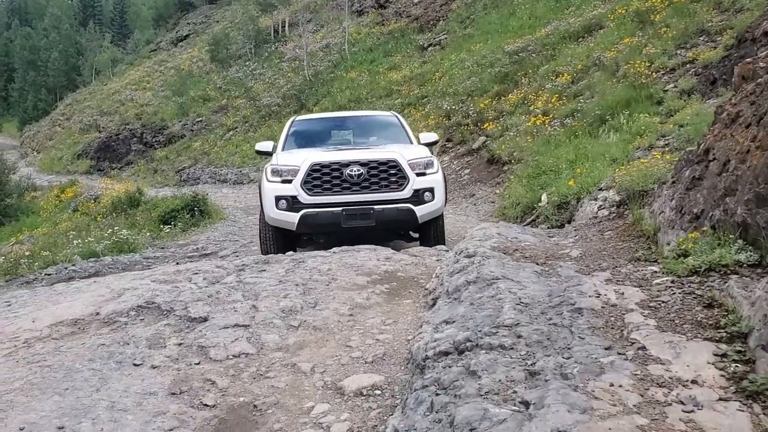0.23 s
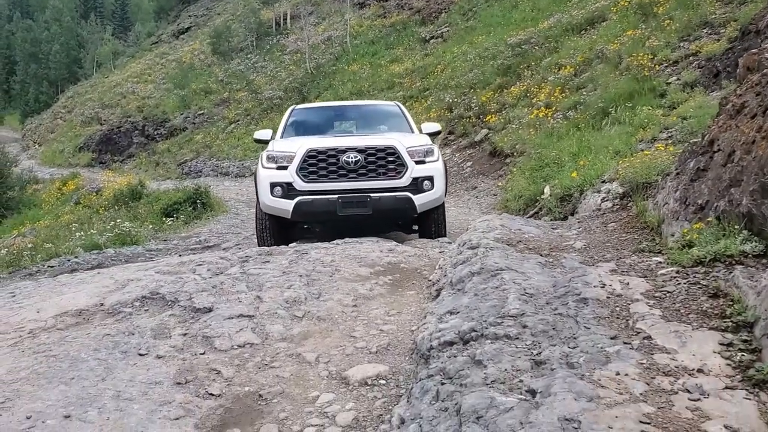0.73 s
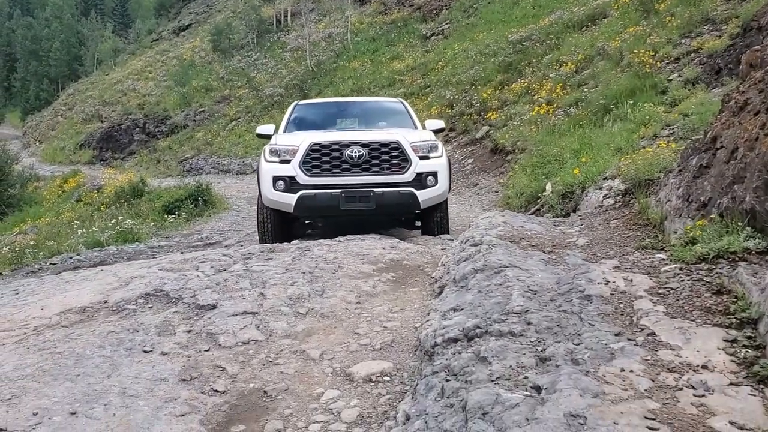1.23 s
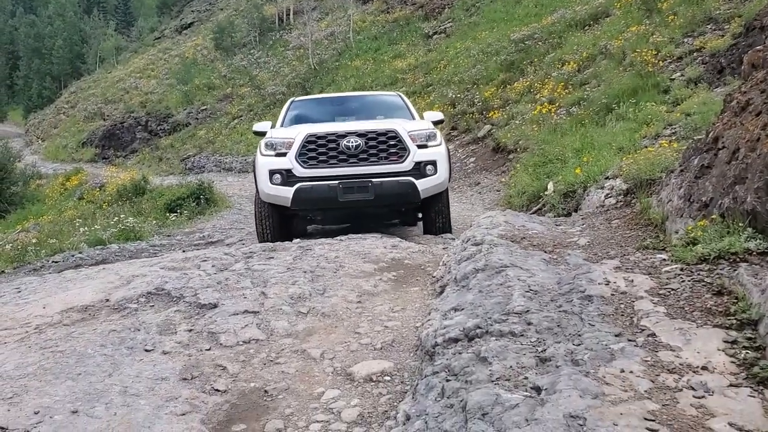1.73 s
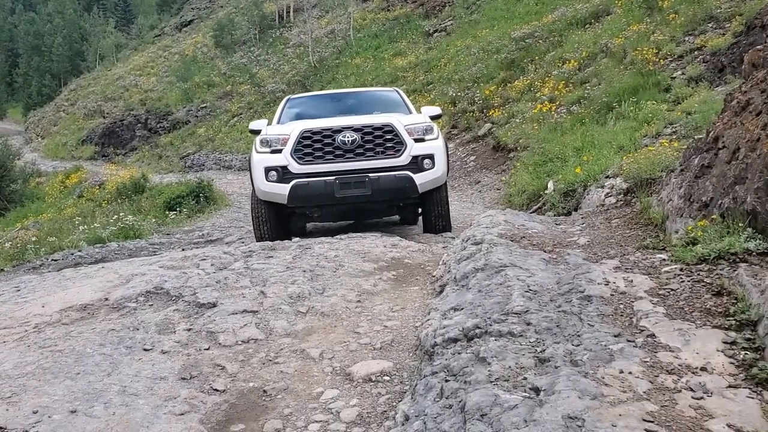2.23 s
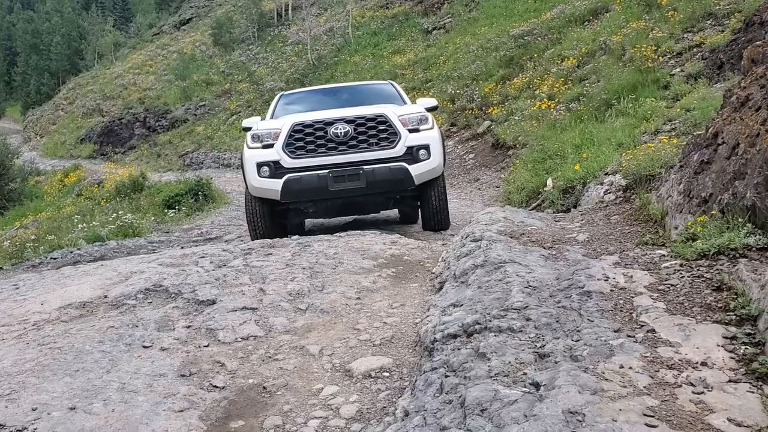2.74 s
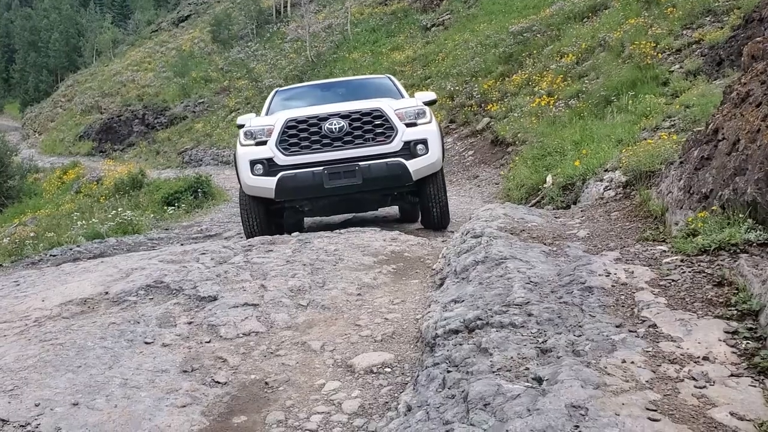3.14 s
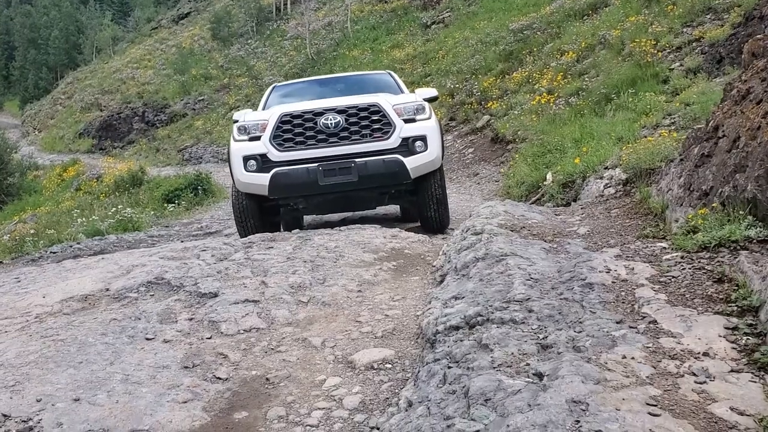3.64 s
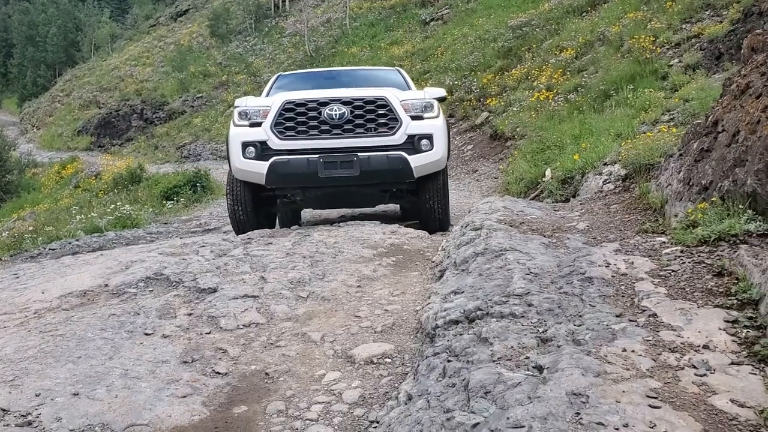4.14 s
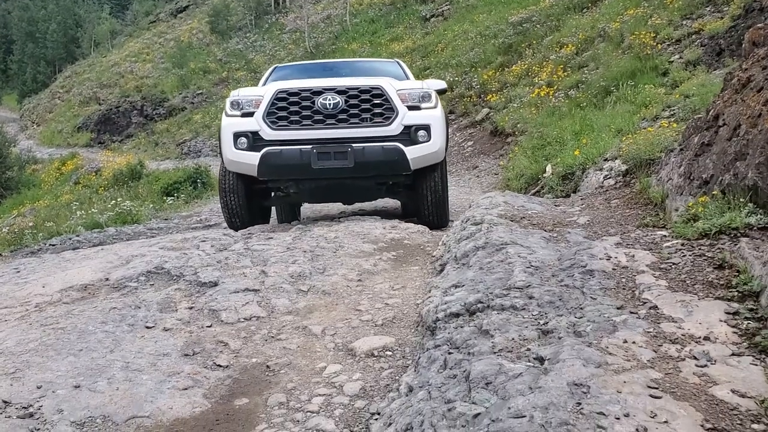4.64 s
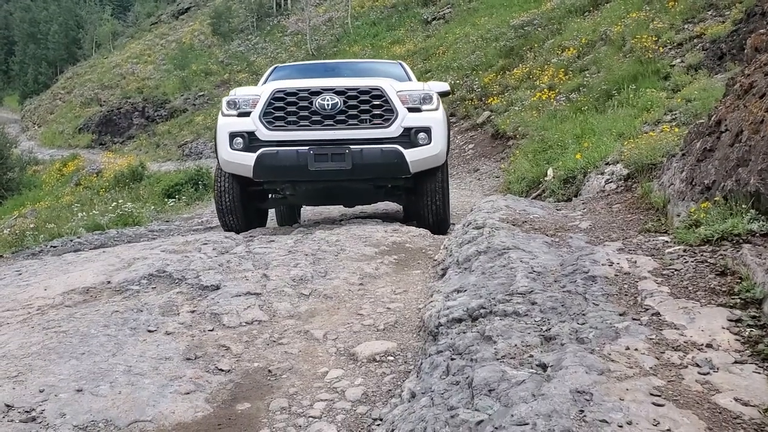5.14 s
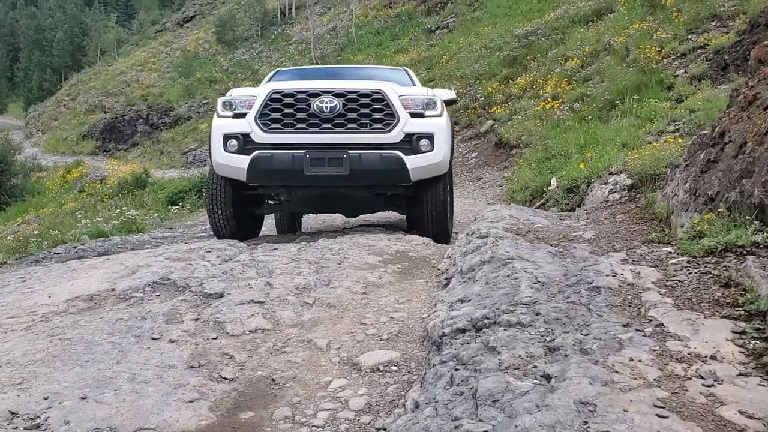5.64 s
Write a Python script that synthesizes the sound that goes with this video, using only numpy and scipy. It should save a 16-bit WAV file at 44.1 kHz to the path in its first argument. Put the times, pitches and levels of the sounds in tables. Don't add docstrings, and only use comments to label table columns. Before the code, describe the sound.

Close, dry outdoor stereo: a low, throbbing petrol engine labours with irregular hard firings and brief dips, while broad airy fan noise swells and eases. Early rubber chirps and grit ticks give way to short scuffs, a sharp stone crack just before three seconds with wind thumps, then a quieter spell and heavier surges near the end.

```python
import sys
import numpy as np
from scipy import signal
from scipy.fft import rfft, irfft, next_fast_len
from scipy.io import wavfile
from scipy.ndimage import uniform_filter1d, map_coordinates

SR = 44100
rng = np.random.default_rng(int(sys.argv[2]) if len(sys.argv) > 2 else 0)


def amplitude_ratio(level_db):
    exponent = np.asarray(level_db, float) / 20
    return 10 ** exponent


def transcribe(u):
    v = np.clip(np.atleast_2d(u).T, -1, 1)
    q = np.round(v * 32767).astype(np.int16)
    wavfile.write(sys.argv[1], SR, q)


N = 259749

# (time [s], boom order [Hz], exhaust boom level [dB])
CRANK = [(0, 107, -39), (.33, 101, -42.5), (.7, 73, -47), (.87, 84, -43), (1.02, 103, -43), (1.3, 130, -37),
         (1.5, 136, -36), (2.1, 115, -39.5), (2.45, 131, -34.5), (2.8, 134, -35.5), (3.05, 117, -42),
         (3.3, 114, -53), (3.45, 118, -41.5), (3.75, 122, -40.5), (4.25, 135, -40.5), (4.75, 100, -42),
         (5.32, 118, -35.5), (5.5, 121, -38), (5.89, 122, -38)]
# (time [s], flow level [dB])
AIR_FLOW = [(0, -49), (.39, -47), (.55, -50), (.8, -50), (1.08, -46.5), (1.44, -44), (1.84, -46.5),
            (2.15, -46.5), (2.46, -43), (2.6, -43), (2.92, -46), (3.5, -48), (4.28, -47.5), (4.69, -47),
            (5.12, -45.5), (5.89, -43.5)]
USUAL_LOAD_DB, USUAL_FLOW_DB = -39, -47

# (frequency [Hz], level per Hz [dB])
PIPE = [(35, -40), (55, -17.5), (78, 0.5), (105, 1.5), (130, -5), (150, -3), (178, -7), (205, -17.5),
        (260, -24.5), (420, -65)]
# (frequency [Hz], width [Hz], level [dB])
UNDERBODY = [(257.7, 91, 6), (325, 160, -17)]
GROWL_DB, GROWL_PER_LOAD, GROWL_PER_FLOW = -47, 0.46, 0.55
# (middle time [s], peak level [dB], length [s])
PULLS = [(.1, -34, 0.053), (.82, -39.5, 0.11), (1.03, -35, 0.17), (1.2, -31, 0.18), (1.5, -41.5, 0.13),
         (2.05, -37.5, 0.15), (2.28, -32.5, 0.17), (2.8, -43, 0.18), (3.1, -36.5, 0.23), (3.33, -47, 0.16),
         (3.5, -48, 0.11), (3.66, -49, 0.067), (4.3, -47, 0.16), (4.9, -40, 0.24), (5.2, -34.5, 0.3),
         (5.6, -32, 0.13), (5.89, -38, 0.25)]
HUM_DB = -49.5
# (middle time [s], peak level [dB], length [s], frequency [Hz])
LUGS = [
    (0.046, -35.5, 0.11, 79.8),
    (1.285, -32, 0.074, 87.2),
    (1.497, -32.5, 0.12, 91.4),
    (2.353, -28, 0.06, 88.32),
    (2.485, -34, 0.12, 92.1),
    (2.653, -18.5, 0.031, 97.5),
    (4.203, -37.5, 0.16, 103.9),
    (4.422, -40, 0.12, 94.9),
    (5.51, -34, 0.081, 94.8),
    (5.89, -29, 0.062, 100.1),
]
# (middle time [s], peak level [dB], length [s])
WHINE = [
    (2.42, -46, 0.061),
    (2.65, -45, 0.19),
]
# (time [s], peak level [dB], ring [Hz], depth of the gap before [dB])
SURGES = [(0.42, -26, 78.1, 3), (0.504, -24, 129, 1), (0.644, -21, 78.1, 10), (0.747, -22, 75.4, 3),
          (1.009, -22, 94.2, 6), (1.276, -17, 102, 3.5), (1.573, -25, 113, 1.5), (1.744, -22, 90, 2),
          (1.923, -17, 107, 1), (2.032, -20, 79, 6.5), (2.334, -20, 91.5, 4), (2.759, -23, 88.8, 2),
          (3.007, -23, 83.4, 4), (3.345, -25, 67.3, 6), (3.556, -27, 80.7, 4), (3.653, -20, 72.7, 6),
          (3.803, -23, 94.2, 5), (4.011, -25, 83.4, 3), (4.103, -29, 91.5, 4), (4.182, -18, 99.6, 5),
          (4.584, -34, 75.4, 1), (4.645, -23, 93, 4), (4.731, -28, 102, 0), (4.829, -16, 72.7, -2),
          (5.076, -29, 103, 3), (5.171, -11.5, 111, 2), (5.28, -14.5, 109, 7.5), (5.431, -31, 102, 2),
          (5.519, -27, 88.8, 2), (5.673, -19, 110, 2)]
SURGE_DB, SURGE_T60_S, GAP_S = -5, 0.086, 0.015
CHUG = .35

# (frequency [Hz], width [Hz], level [dB])
INTAKE = [(572, 180, 0), (760, 600, -3.5), (421, 190, 2)]
# (frequency [Hz], width [Hz], level [dB])
AIRBOX = [(536, 85, -0.5), (600, 80, -1), (720, 110, -10)]
# (middle time [s], change of level [dB], length [s])
TRACT = [
    (0.856, -9, 0.06),
    (1.67, 2, 0.4),
    (2.547, 1.5, 0.12),
    (2.76, 1.5, 0.14),
    (3.5, -2, 0.24),
    (5.502, 0, 0.37),
]
ROAR_DB, ROAR_PER_LOAD, ROAR_PER_FLOW = -48, 0.14, 0.27
# (frequency [Hz], level per Hz [dB])
FAN = [(410, -5.5), (700, 0.5), (825, -4.5), (983, -4.5), (1270, -2), (1380, -3), (1660, -3.5),
       (2330, -5.5), (2540, -5.5), (2930, -9.5), (4610, -18.5), (6540, -23), (8200, -36.5), (10700, -49),
       (18000, -120)]
# (frequency [Hz], width [Hz], level [dB])
SHROUD = [(1020, 370, 3), (1635, 470, 3), (2485, 220, 5)]
# (frequency [Hz], level per Hz [dB])
FIZZ = [(4120, -43), (7000, -4.5), (8040, -14), (9060, -5.5), (10100, -10), (11200, -9.5), (12100, -13),
        (12700, -15), (13300, -11), (14000, -9.5), (15700, -12)]
FIZZ_DB, FIZZ_PER_FLOW = -68.5, 1.46
FIZZ_PER_REV, FIZZ_LAG_S = 0.04, 0.1

# (frequency [Hz], level per Hz [dB])
BUFFET = [(12, -48), (20, -13), (52, 4), (75, 4), (97, -0.5), (163, -15.5), (189, -15.5), (300, -33.5),
          (390, -53), (660, -120)]
# (middle time [s], peak level [dB], length [s], left minus right [dB])
GUSTS = [(0.013, -42.5, 0.06, -21), (0.284, -39.5, 0.11, -8), (0.437, -37, 0.034, -14),
         (0.71, -36, 0.18, -2), (0.604, -51, 0.092, -5), (0.847, -39.5, 0.11, -12),
         (1.04, -37.5, 0.042, -25), (1.166, -40.5, 0.07, -22), (1.592, -41, 0.029, -17),
         (1.663, -28.5, 0.027, -2.5), (2.035, -38.5, 0.072, -16.5), (2.504, -42, 0.04, -13),
         (2.55, -41, 0.014, 20), (2.678, -34.5, 0.055, -15.5), (2.809, -34.5, 0.027, -22),
         (2.962, -28, 0.078, -6.5), (3.04, -34, 0.035, -9), (3.105, -33, 0.054, -14),
         (3.262, -34, 0.044, 8), (3.375, -32.5, 0.049, 12.5), (3.704, -44.5, 0.17, 11),
         (3.82, -36.5, 0.11, -10), (4.026, -38, 0.048, -5), (4.449, -38, 0.024, -23),
         (4.584, -39.5, 0.11, 13), (4.833, -36.5, 0.068, -11), (5.023, -41, 0.019, -24),
         (5.298, -43, 0.091, -12), (5.541, -38.5, 0.03, -19), (5.596, -46, .025, 8.5)]
BREEZE_DB, BREEZE_PAN_DB = -47, -10.5
# (time [s], left size [full scale], right size [full scale], width [s])
THUMPS = [
    (1.749, 0, -.09, .0018),
    (1.762, -.06, -.07, .0018),
    (2.7695, 0, -.13, .002),
    (2.775, 0, .2, .0016),
    (2.805, .04, .17, .003),
    (3.343, -.1, 0, .002),
    (3.384, .16, 0, .0012),
    (3.389, -.08, 0, .002),
]

# (middle time [s], peak level [dB], frequency [Hz], length [s])
THUDS = [(1.55, -41, 180, 0.027), (1.97, -38, 184, .05), (2.09, -43.5, 247, 0.034),
         (2.975, -35, 166, 0.032), (3.9, -40, 165, 0.064), (5.62, -41, 149, .05), (1.76, -40, 180, .03),
         (5.19, -40, 185, .03), (5.3, -40, 175, .03), (.03, -38, 110, .05), (1.2, -44, 270, .04)]
# (middle time [s], peak level [dB], frequency [Hz], length [s])
PINGS = [
    (2.699, -38, 975, .009),
    (.3955, -35, 2800, .0018),
    (.4003, -39, 2950, .0014),
    (.4165, -37.5, 2800, .0018),
    (.4345, -40, 2900, .0018),
    (.384, -42, 2900, .0018),
    (.4105, -42, 3000, .0016),
]
# (middle time [s], peak level [dB], length [s])
CRUSH = [
    (.15, -51.5, 0.67),
    (1.2, -60, 0.43),
    (3.7, -58, 0.59),
    (5.55, -51.5, 0.4),
]
BARE_ROCK_DB = -60.5
# (frequency [Hz], width [Hz], level [dB])
GRIT = [(941, 190, -4.5), (1403, 180, -9)]
# (time [s], peak level [dB], pitch [Hz], left minus right [dB])
TICKS = [(.2208, -52, 13500, -10), (.2792, -48, 14500, -9), (.2977, -39.5, 14000, -10),
         (.2979, -54, 6000, -8), (.2982, -47, 2300, -6), (.8762, -46, 10000, 2), (.8765, -44, 13500, 2),
         (.9003, -51, 14000, 2), (1.4361, -53, 8500, -4), (2.9637, -54, 7300, -6), (3.5244, -59, 8900, -4),
         (4.0045, -54, 7300, -10), (4.412, -55, 9000, -4), (4.5862, -55, 7100, -6), (4.9353, -56, 7100, -3),
         (5.1062, -55, 7500, -4), (5.265, -55, 8000, -4), (5.4295, -51, 12000, -6), (5.5611, -51, 9500, -6),
         (5.757, -55, 13000, -4)]
# (time [s], peak level [dB], left minus right [dB], width [s])
CRACK = [
    (2.78058, -21, -4, .00015),
    (2.78197, -24, -2, .00024),
]
# (frequency [Hz], level [dB], decay by 60 dB [s])
STONE = [(220, -9, .04), (600, -12, .012), (830, -13, .007), (2100, -22, .004), (2750, -6.5, .004),
         (8800, -29, .004)]
# (middle time
# [s], level [dB], pitch [Hz], width [Hz], length [s])
SCUFFS = [(.397, -50, 2800, 750, 0.015), (.394, -55, 3800, 1500, 0.015), (.412, -52, 2900, 890, 0.025),
          (0.39, -69, 9500, 7000, 0.05), (0.46, -67, 6400, 4500, 0.027), (1.35, -46.5, 3000, 1600, 0.016),
          (1.345, -49, 1700, 1300, 0.015), (1.377, -49, 1500, 700, .012), (1.5, -64, 10500, 3000, .01),
          (1.483, -69, 10500, 4500, .022), (1.541, -48, 2700, 700, 0.018), (1.574, -65, 10000, 4500, .012),
          (1.489, -52, 1600, 430, 0.025), (1.617, -48, 1530, 500, 0.03), (2.402, -58, 2530, 280, .25),
          (2.248, -51.5, 1730, 240, 0.16), (2.684, -58, 1990, 1400, .004), (2.694, -49, 4200, 3500, 0.014),
          (2.692, -69, 13000, 5000, .01), (3.667, -49.5, 2600, 1400, 0.019), (4.052, -61, 5000, 3000, .013),
          (5.428, -52.5, 3400, 2700, 0.02), (5.88, -67, 9800, 8800, .015), (.6, -74, 12000, 9000, .2),
          (.745, -73, 11000, 8000, .03), (.47, -74, 12000, 9000, .06), (1.4, -58, 2520, 220, .3),
          (.394, -52, 2550, 500, .008), (1.88, -68, 8000, 6000, .012)]
SCUFF_PAN_DB = -8
RISE_SHARE = .3

# (frequency [Hz], left-right correlation [-1 to 1])
ALIKE = [(60, 1), (110, 1), (200, 1), (380, 0.8), (700, 0.88), (1290, -0.076), (2380, 0.35), (4400, 0.24),
         (8120, -0.066), (15000, -0.19)]
# (frequency [Hz], left minus right [dB])
LEAN = [(60, 1.5), (250, -3), (480, 1.5), (800, -3.5), (1150, 0), (1400, -6), (1700, -1), (2100, -7.5),
        (2800, -6.5), (4200, 0.5), (6200, -8.5), (7600, -8), (9800, -0.5), (15000, -5.5)]
SILENT_DB, TOP_HZ = -75, 15765


def unit(x):
    return x / np.sqrt(np.mean(x ** 2) + 1e-20)


def along(points, hz):
    f, value = np.transpose(points)
    return np.interp(np.log(hz + 1), np.log(f + 1), value)


def curves(rows):
    s, *columns = np.transpose(rows)
    return [np.interp(np.arange(N) / SR, s, column) for column in columns]


def wobble(rate):
    knots = rng.standard_normal(int(N * rate / SR) + 4)
    return map_coordinates(knots, [np.arange(N) * rate / SR])


def swells(rows, rest_db):
    t = np.arange(0, N + 64, 64) / SR
    bells = sum(amplitude_ratio(2 * db) * np.exp(-2 * ((t - s) / length) ** 2) for s, db, length in rows)
    power = amplitude_ratio(2 * rest_db) + bells
    return np.interp(np.arange(N) / SR, t, 10 * np.log10(power))


def filtered(x, response):
    m = next_fast_len(N + SR // 2)
    return irfft(rfft(x, m) * response(np.fft.rfftfreq(m, 1 / SR)), m)[..., :N]


def modes(table):
    return lambda f: sum((-1) ** k * amplitude_ratio(db) * 1j * f * width / (centre * centre - f * f + 1j * f * width)
                         for k, (centre, width, db) in enumerate(table))


def shape(spectrum):
    return lambda hz: amplitude_ratio(along(spectrum, hz))


def patchy(patchy_db):
    z = signal.stft(rng.standard_normal((2, N + 512)), nperseg=512)[2]
    field = uniform_filter1d(rng.standard_normal(z.shape[1:]), 8, 0)
    field = uniform_filter1d(field, 10, 1)
    return unit(signal.istft(z * amplitude_ratio(patchy_db * unit(field)), nperseg=512)[1][:, :N])


def even(x, span):
    power = np.mean(np.atleast_2d(x) ** 2, axis=0)
    return x / np.sqrt(np.abs(uniform_filter1d(power, round(span * SR))) + 1e-9)


def spread(pair, response):
    def mid_side(hz):
        turn = np.arccos(np.clip(along(ALIKE, hz), -1, 1)) / 2
        return response(hz) * [np.cos(turn), np.sin(turn)]
    mid, side = filtered(pair, mid_side)
    return unit(np.array([mid + side, mid - side]))


def sides(pan_db):
    return amplitude_ratio(np.array([pan_db / 2, -pan_db / 2]))


def tone(hz, db):
    hz, db = uniform_filter1d(np.array([hz, db]), SR // 12, axis=1)
    level = np.sqrt(2) * amplitude_ratio(db + 1.8 * wobble(28))
    cycles = np.cumsum(hz * (1 + .01 * wobble(25))) / SR
    return level * np.sin(2 * np.pi * cycles)


def opening():
    t = np.arange(N) / SR
    return sum(db * np.exp(-((t - s) / length) ** 2) for s, db, length in TRACT)


def exhaust():
    boom_hz, boom_db = curves(CRANK)
    growl_db = GROWL_DB + GROWL_PER_LOAD * (boom_db - USUAL_LOAD_DB)
    growl_db = growl_db + GROWL_PER_FLOW * (curves(AIR_FLOW)[0] - USUAL_FLOW_DB) + opening()

    turns = np.cumsum(boom_hz / 2 * (1 + .13 * wobble(40))) / SR
    fired = np.diff(np.floor(turns), prepend=0) > 0
    firings = unit(fired * amplitude_ratio(2.5 * rng.standard_normal(N)))
    gas = (1 + 0.15 * np.cos(2 * np.pi * turns)) * patchy(patchy_db=-3.0)
    boom = spread(gas + [[.85], [0]] * firings, shape(PIPE))
    growl = spread(gas[:, ::-1] + [[.6], [0]] * firings, lambda f: modes(UNDERBODY)(f) ** 2)
    sound = amplitude_ratio(boom_db + 3.5) * even(boom, span=0.18) + amplitude_ratio(growl_db - 1.5) * even(growl, span=0.18)

    chug = 1 + CHUG * np.cos(np.pi * turns)
    pull = chug * tone(boom_hz, swells(PULLS, HUM_DB))
    lug_hz, = curves([(s, hz) for s, _, _, hz in LUGS])
    lug = tone(lug_hz, swells([row[:3] for row in LUGS], SILENT_DB))
    whine = tone(2 * boom_hz, swells(WHINE, SILENT_DB))
    gaps, rings = surges()
    return gaps * (sound + pull + lug + whine) + rings


def bay():
    t = np.arange(N) / SR
    crank_hz, boom_db = curves(CRANK)
    rush_db, = curves(AIR_FLOW)
    more_db = rush_db - USUAL_FLOW_DB
    flutter = .35 * wobble(8) + .5 * wobble(20)

    load_db = uniform_filter1d(boom_db, SR // 4) - USUAL_LOAD_DB
    roar_db = ROAR_DB + ROAR_PER_LOAD * load_db + ROAR_PER_FLOW * more_db + opening()
    roar = spread(patchy(patchy_db=-0.5), lambda f: modes(INTAKE)(f) ** 2)
    box = spread(rng.standard_normal((2, N)), lambda f: modes(AIRBOX)(f) ** 2)
    sound = amplitude_ratio(roar_db - 3.5 + 0.35 * flutter) * roar
    sound += amplitude_ratio(-49.0 + 3.15 * (roar_db + 46.5)) * even(box, span=0.11)

    rush = spread(patchy(patchy_db=0.77), lambda f: shape(FAN)(f) + amplitude_ratio(-24.0) * modes(SHROUD)(f) ** 2)
    sound += amplitude_ratio(rush_db + 2.5 + flutter) * rush

    revving = np.clip(np.gradient(uniform_filter1d(crank_hz, SR // 5)) * SR, 0, None)
    fizz_db = FIZZ_DB + FIZZ_PER_FLOW * more_db + FIZZ_PER_REV * np.interp(t - FIZZ_LAG_S, t, revving)
    fizz_db = fizz_db + 1.2 * flutter + .5 * wobble(18)
    return sound + amplitude_ratio(fizz_db) * spread(patchy(patchy_db=2.0), shape(FIZZ))


def wind():
    ports_db = []
    for side in (1, -1):
        gusts = [(s, db + side * pan_db / 2, length) for s, db, length, pan_db in GUSTS]
        ports_db.append(swells(gusts, BREEZE_DB + side * BREEZE_PAN_DB / 2))
    lumps = amplitude_ratio(1.25 * np.array([wobble(25), wobble(24)]))
    eddies = filtered(lumps * rng.standard_normal((2, N)), shape(BUFFET))
    sound = amplitude_ratio(np.array(ports_db) + 4) * [even(port, span=0.081) for port in eddies]
    for s, left, right, width in THUMPS:
        near = slice(round(s * SR) - 1000, round(s * SR) + 1000)
        u = np.arange(-1000, 1000) / SR / width
        bump = (1 - u ** 2 / 2) * np.exp(-u ** 2 / 4)
        sound[:, near] += np.outer([left, right], bump)
    return sound


def tyres():
    t = np.arange(N) / SR
    notes = sum(amplitude_ratio(db) * np.exp(-((t - s) / length) ** 2) * np.sin(2 * np.pi * hz * (t - s))
                for s, db, hz, length in PINGS + THUDS)
    return grit() + scuffs() + notes


def grit():
    sound, t = np.zeros((2, N + SR)), np.arange(1000) / SR
    for s, db, hz, pan_db in TICKS:
        tick = np.sin(2 * np.pi * hz * t) + .22 * np.diff(rng.standard_normal((2, len(t) + 2)), 2)
        envelope = amplitude_ratio(db + 4 - 60 * t / .0022) * (1 - np.exp(-t / .00006))
        sound[:, round(s * SR):][:, :len(t)] += envelope * tick * sides(pan_db)[:, None]
    for s, db, pan_db, width in CRACK:
        ring = sum(amplitude_ratio(level - 60 * t / t60) * np.sin(2 * np.pi * hz * t) for hz, level, t60 in STONE)
        ring = ring * (1 - np.exp(-t / .0001))
        sound[:, round(s * SR):][:, :len(t)] -= amplitude_ratio(db) * ring * sides(pan_db)[:, None]
        u = (t - t[100]) / width
        snap = u * np.exp(-u ** 2 / 2)
        sound[:, round(s * SR) - 100:][:, :len(t)] -= amplitude_ratio(db + 1) * snap * sides(pan_db)[:, None]
    struck = rng.random((2, N)) < 700 / SR
    grains = struck * rng.standard_normal((2, N)) * amplitude_ratio(2.5 * wobble(25))
    crunch = spread(grains, lambda f: modes(GRIT)(f) ** 2)
    return sound[:, :N] + amplitude_ratio(swells(CRUSH, BARE_ROCK_DB)) * crunch


def scuffs():
    sound, size = np.zeros((2, N + SR)), 16384
    t, f = (np.arange(size) - size / 2) / SR, np.fft.rfftfreq(size, 1 / SR)
    grip = amplitude_ratio(2.2 * wobble(220))
    for s, db, hz, width_hz, length in SCUFFS:
        noise = rng.standard_normal(size) + .5 * rng.standard_normal((2, size))
        rub = even(irfft(rfft(noise) * modes([(hz, width_hz, 0)])(f) ** 2), span=0.0078)
        envelope = amplitude_ratio(db) * np.exp(-(t / length / np.where(t < 0, RISE_SHARE, 1)) ** 2)
        sound[:, round(s * SR) - size // 2:][:, :size] += envelope * rub * sides(SCUFF_PAN_DB)[:, None]
    return grip * sound[:, :N]


def surges():
    gap_db, rings, t = np.zeros(N + SR), np.zeros(N + SR), np.arange(SR // 5) / SR
    for s, db, hz, depth_db in SURGES:
        dip = np.exp(-((t - 1 / 10 + GAP_S / 2) / GAP_S) ** 2)
        gap_db[round(s * SR) - SR // 10:][:len(t)] -= np.clip(depth_db, 0, 20) * dip
        envelope = amplitude_ratio(db + SURGE_DB - 60 * t / SURGE_T60_S) * (1 - np.exp(-t / .004))
        rings[round(s * SR):][:len(t)] += envelope * np.sin(2 * np.pi * hz * t)
    return amplitude_ratio(gap_db[:N]), rings[:N]


def scene():
    truck = filtered(exhaust() + bay(), lambda hz: sides(along(LEAN, hz)))
    return truck + wind() + tyres()


def top_cut(x):
    return signal.sosfilt(signal.butter(12, 15880, fs=SR, output="sos"), x)


def record(dry):
    mix = filtered(dry, lambda hz: (hz < TOP_HZ) * 1j * hz / (25 + 1j * hz))
    return top_cut(mix)


dry = scene()
out = record(dry)
transcribe(out)
```